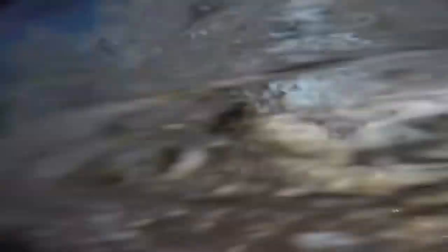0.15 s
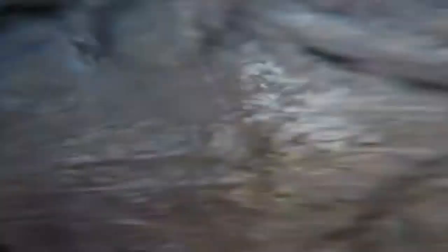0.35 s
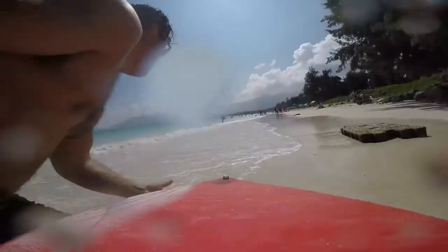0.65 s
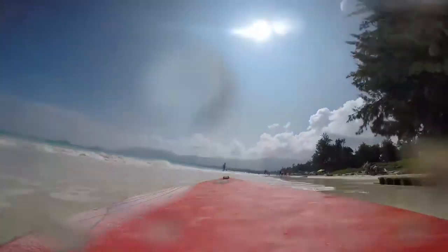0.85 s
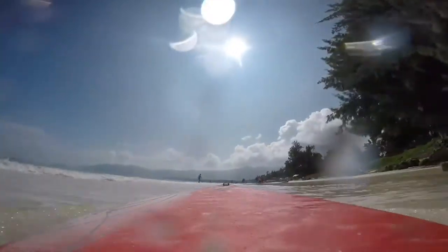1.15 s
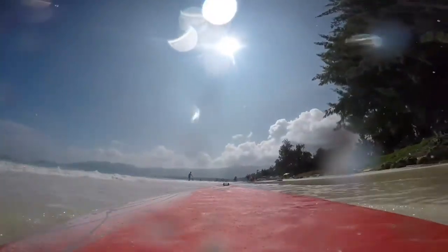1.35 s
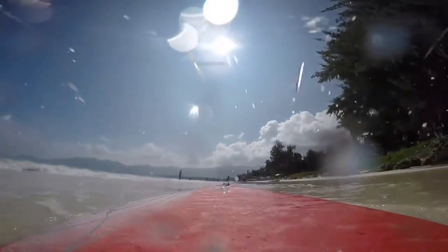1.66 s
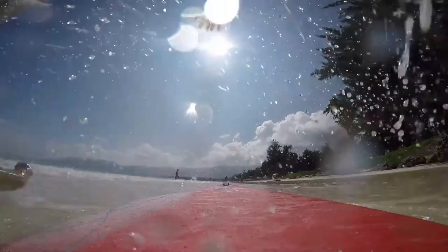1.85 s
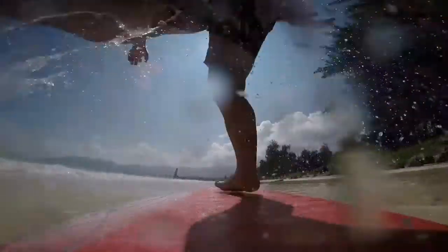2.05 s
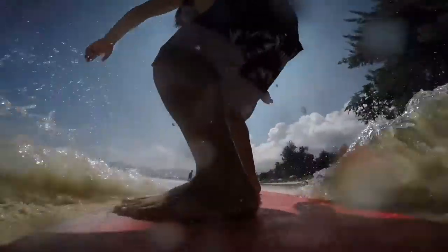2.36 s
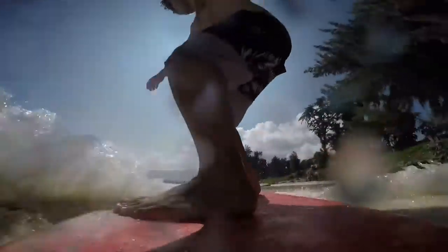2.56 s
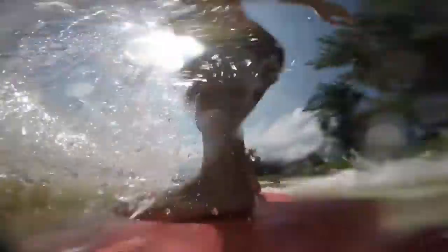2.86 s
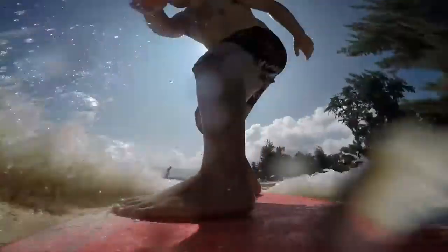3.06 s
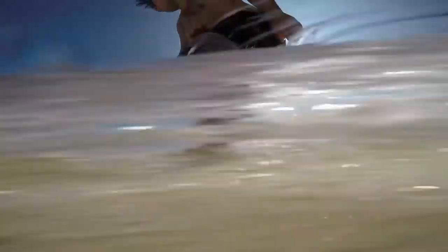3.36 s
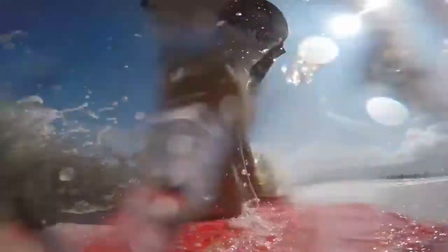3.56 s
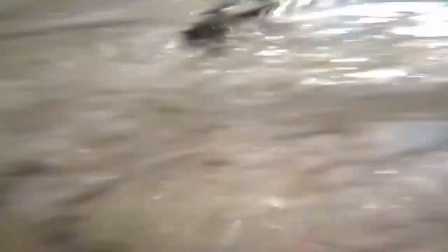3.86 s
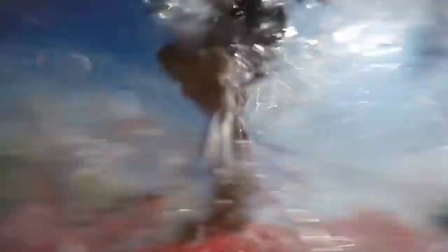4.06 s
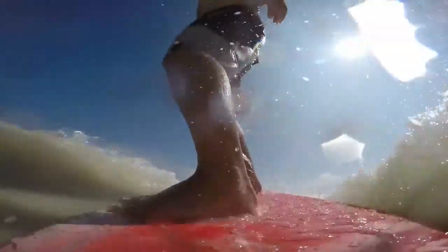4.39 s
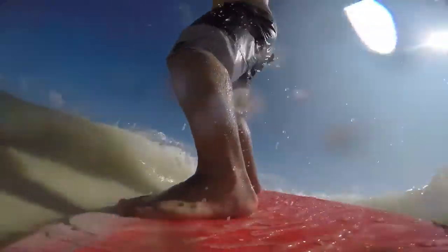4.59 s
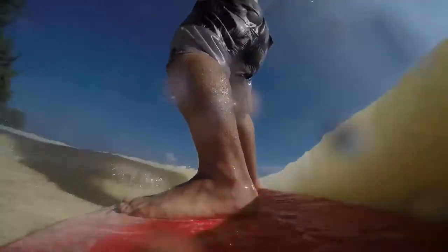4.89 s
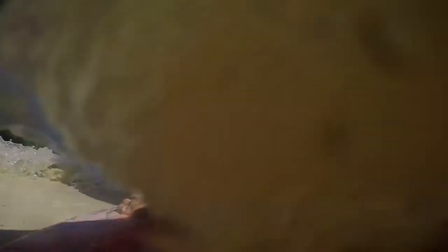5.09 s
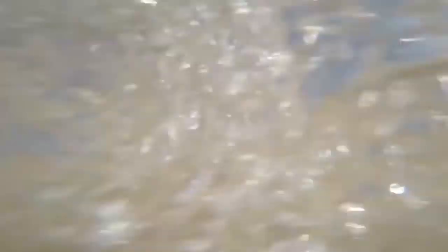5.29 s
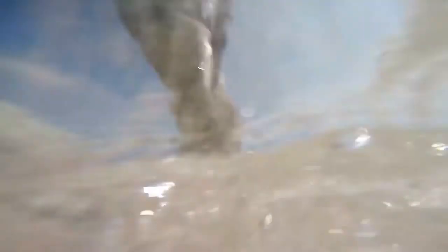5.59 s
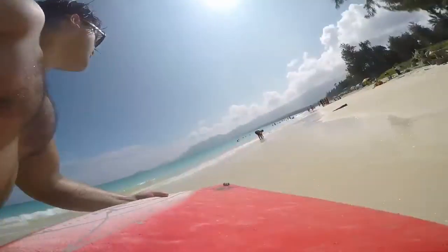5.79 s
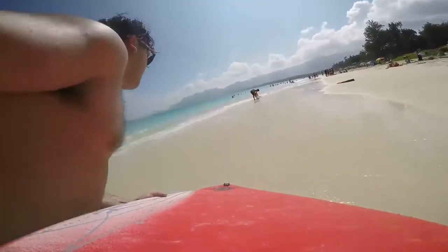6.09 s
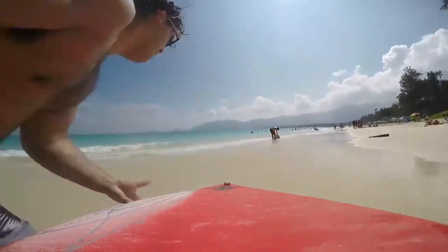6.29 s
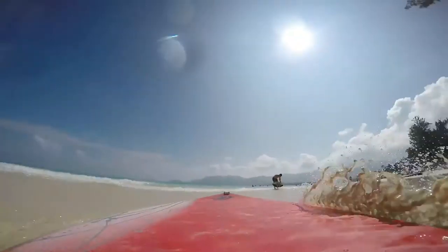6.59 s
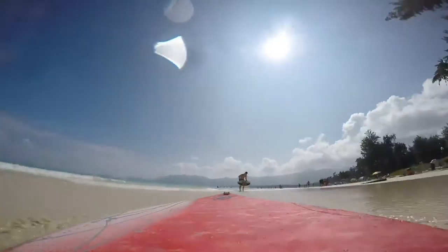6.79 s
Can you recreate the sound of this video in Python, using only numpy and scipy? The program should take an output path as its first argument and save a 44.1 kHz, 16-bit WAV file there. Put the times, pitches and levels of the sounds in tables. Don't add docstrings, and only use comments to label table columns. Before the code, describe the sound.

The sound starts at full force: foam gushes and crackles over a hard hollow case, with sharp ringing drops, until it stops abruptly near 0.5 s. Small slaps and clicks lead to a very loud, overloaded knock with a deep thud at 0.95 s. From 1.0 to 1.7 s it is nearly quiet, just faint fizz. Light plastic taps at 1.7 s and board knocks around 2.15 s follow, with low booming and thin froth. A hard bright splash-smack lands at 2.8 s, another at 3.4 s, and a crackling cluster at 3.75-4.0 s. Gurgling and rumble continue; water sheets build from 4.97 s into slaps at 5.13 s, then a deep thump and a big bubble gulping upward at 5.2-5.35 s. It thins out, with knocks at 5.84 s, wet clicks near 6.1 s, a tap at 6.39 s and a distorted bang at 6.55 s, fading to soft fizz by 7 s.

```python
import sys
import numpy as np
from scipy import signal
from scipy.fft import rfft, irfft, next_fast_len
from scipy.io import wavfile
from scipy.ndimage import uniform_filter1d

SR = 44100
rng = np.random.default_rng(int(sys.argv[2]) if len(sys.argv) > 2 else 0)


def elevation(decibels):
    levels = np.asarray(decibels, float)
    return 10 ** (levels / 20)


def digitize_waveform(pressure):
    field = np.atleast_2d(pressure).T
    bounded = np.clip(field, -1, 1)
    quanta = np.round(bounded * 32767).astype(np.int16)
    wavfile.write(sys.argv[1], SR, quanta)


N = 306054


def evened(x):
    return x / np.sqrt(np.mean(x ** 2) + 1e-20)


def curve(rows, column):
    rows = np.vstack(rows)
    return elevation(np.interp(np.arange(N) / SR, rows[:, 0], rows[:, column]))


def colour(x, points):
    hz, db = np.transpose(points)
    size = next_fast_len(len(x))
    bin_hz = np.fft.rfftfreq(size, 1 / SR)
    gain = elevation(np.interp(np.log(bin_hz + 1), np.log(hz), db))
    return irfft(rfft(x, size) * gain, size)[:len(x)]


def band(x, lo_hz, hi_hz, order=2):
    edges = [lo_hz, min(hi_hz, SR / 2.1)]
    return signal.sosfilt(signal.butter(order, edges, "band", fs=SR, output="sos"), x)


def add(mix, s, sound):
    part = mix[round(s * SR):][:len(sound)]
    part += sound[:len(part)]


def froth(per_s, spread_db, lo_hz, hi_hz, cycles, smooth, count=24):
    out = np.zeros(N)
    for hz in np.geomspace(lo_hz, hi_hz, count):
        u = np.arange(int(3 * cycles * SR / hz)) * hz / SR
        wavelet = hz * np.sin(2 * np.pi * u * (1 + 0.023 * u)) * np.exp(-u / cycles * 2)
        bursts = rng.random(N) < per_s / count / SR
        size = elevation(spread_db * np.minimum(rng.exponential(1, N), 5)) * bursts
        out += signal.oaconvolve(size, wavelet)[:N]
    return evened(out) + smooth * rng.standard_normal(N)


def patchy(x, depth_db, bins=5, frames=14):
    z = signal.stft(x, nperseg=512, noverlap=384)[2]
    patches = uniform_filter1d(rng.standard_normal(z.T.shape).T, bins, 0)
    patches = evened(uniform_filter1d(patches, frames, 1))
    return signal.istft(z * elevation(depth_db * patches), nperseg=512, noverlap=384)[1][:len(x)]


def flicker(hz, depth_db):
    steps = rng.standard_normal(int(N / SR * hz) + 2)
    return elevation(depth_db * np.interp(np.arange(N) / SR * hz, np.arange(len(steps)), steps))


# frequency in Hz, level in dB per Hz.
FOAM = [(290, -54.5), (500, -31.5), (571, -54), (666, -8), (949, 3.5), (1040, 7), (1240, 10), (1410, 4),
        (2510, 6), (2800, 5), (3160, -8), (3490, -2), (7000, -20.5), (9100, -72.5), (15400, -120)]
# frequency in Hz, level in dB per Hz.
SPRAY = [(2060, -8.5), (3500, -14), (4470, -1.5), (5330, -5.5), (5910, -5.5), (7260, -12), (13800, -19.5),
         (15700, -26.5), (16400, -86)]
# frequency in Hz, level in dB per Hz.
SHEET = [(350, -37), (600, -13.5), (687, -6), (1060, 2), (1770, -1.5), (2100, 4), (2430, 1.5),
         (4450, -10.5), (5450, -24), (6000, -25.5), (7800, -43), (13200, -120)]
# time in seconds, foam, spray and slosh levels in dB.
WATER = [(0.0, -25, -29.5, -27), (0.07, -14.5, -23, -43), (0.15, -25, -31.5, -43.5),
         (0.274, -23.5, -38.5, -42), (0.424, -17.5, -29.5, -34), (0.494, -12, -30, -33.5),
         (0.509, -44.5, -61, -46), (0.539, -41, -55.5, -48), (0.718, -42, -48, -58), (0.883, -39, -49, -54),
         (0.913, -46.5, -55, -55), (1.187, -44.5, -63, -57.5), (1.282, -55, -72, -60),
         (1.497, -47, -69.0, -55), (1.546, -45.5, -63, -49.5), (1.786, -50, -65, -63),
         (1.816, -43, -53, -41), (1.866, -50.5, -59, -54), (1.931, -41, -55, -52.0), (2.05, -47, -61, -49),
         (2.115, -43.5, -55, -45), (2.35, -38.5, -47, -37), (2.38, -37.5, -48, -44),
         (2.519, -42.5, -55, -48.5), (2.624, -34.5, -52, -43.5), (2.754, -38, -52, -52.0),
         (3.003, -41.5, -55, -39), (3.283, -40, -51.5, -52), (3.637, -37, -56, -44),
         (3.732, -35.5, -43, -48), (4.026, -43, -41, -57), (4.096, -38, -52, -39),
         (4.275, -43.5, -52.5, -49.5), (4.375, -42, -59, -48), (4.475, -41, -60, -38),
         (4.57, -46, -57, -45.5), (4.649, -44.5, -62, -53), (4.869, -39.5, -50, -51.5),
         (5.353, -42, -60, -49.5), (5.443, -42.5, -55.5, -39.5), (5.532, -39.5, -54.5, -53),
         (5.732, -35.5, -51, -54), (5.747, -46.5, -59.5, -52), (5.941, -46.0, -54.5, -53),
         (5.996, -43.5, -53.5, -44), (6.435, -41.5, -53, -62), (6.495, -54.5, -63.0, -56.5),
         (6.67, -46, -64, -50.5), (6.72, -55.5, -65, -63.5), (6.939, -48.5, -66.5, -58)]


def water():
    surge = flicker(40, depth_db=1.4)
    foam_level, spray_level, slosh_level = (curve(WATER, column) for column in (1, 2, 3))

    bubbles = patchy(froth(4000, 3.9, 600, 6220, cycles=4.6, smooth=1.2), depth_db=1.55)
    wet = np.clip(foam_level / elevation(-26.5), 0, 1) ** 2
    distant = np.sqrt(1 - wet) * evened(colour(bubbles, FOAM))
    touching = np.sqrt(wet) * evened(colour(bubbles, SHEET))
    foam = elevation(-0.13) * foam_level * evened(distant + touching)

    fine = patchy(froth(3000, 3.0, 4000, 17000, cycles=2.4, smooth=0.57), depth_db=3.0)
    spray = elevation(-2.0) * spray_level * evened(colour(fine, SPRAY))

    dull = band(froth(600, 3.0, 250, 1000, cycles=2.9, smooth=1.1), 210, 1000, order=3)
    slosh = elevation(-0.1) * slosh_level * evened(dull)
    return surge * (foam + spray + slosh)


# time in seconds, board boom in dB, handling sway in dB.
BOARD = [(0.0, -20, -24), (0.075, -15, -19.5), (0.11, -31.5, -30), (0.229, -33.5, -36),
         (0.444, -29.5, -33.5), (0.489, -17.5, -25), (0.654, -32.5, -17), (0.728, -18.5, -16.5),
         (0.938, -21.5, -13), (0.948, -1.5, -5), (1.078, -44.5, -50), (1.227, -52, -53),
         (1.322, -39.5, -48), (1.377, -45, -52), (1.556, -36.5, -50), (1.671, -56, -48),
         (1.771, -24.5, -36.0), (1.846, -17.5, -41), (1.931, -41.5, -43.0), (1.98, -18.5, -48),
         (2.05, -42.5, -56), (2.16, -14.5, -10), (2.245, -31, -30), (2.295, -15.5, -32), (2.39, -45, -38),
         (2.529, -27, -43), (2.569, -41, -31.5), (2.659, -22.5, -27), (2.709, -34, -34), (2.789, -24, -31),
         (2.829, -6.5, -17), (2.938, -43.5, -43), (3.163, -43, -38), (3.218, -25.5, -51), (3.273, -37, -42),
         (3.397, -36, -28), (3.412, -8, -11.5), (3.557, -30.5, -35.5), (3.751, -33.5, -28),
         (3.766, -6, -13.5), (3.886, -17, -24.5), (4.011, -28.5, -34), (4.121, -17, -30),
         (4.28, -29.5, -34), (4.49, -16.5, -27.5), (4.53, -25, -34), (4.59, -27.0, -35.5),
         (4.629, -45, -29.5), (4.749, -28.5, -33.5), (4.914, -37, -42.0), (5.004, -24, -20.5),
         (5.118, -26.5, -27), (5.218, -9.5, -25), (5.333, -50, -47), (5.478, -49, -51), (5.542, -40.5, -49),
         (5.627, -64, -49.5), (5.767, -37, -33.5), (5.832, -27, -23), (5.847, -18.5, -16),
         (5.986, -35.5, -31.5), (6.051, -19.5, -20), (6.261, -42.5, -16), (6.38, -13.5, -11.5),
         (6.535, -29, -31.5), (6.55, -11.5, -4), (6.615, -17.5, -26), (6.73, -60, -62), (6.82, -51.5, -57),
         (6.939, -63.5, -60)]


def board():
    def steady(x):
        return x / np.sqrt(uniform_filter1d(x ** 2, size=2600) + .07 * np.mean(x ** 2))

    push, load = curve(BOARD, 1), curve(BOARD, 2)
    boom = band(band(rng.standard_normal(N), 83.2, 99.2, order=1), 56, 130.4, order=4)
    sway = band(band(rng.standard_normal(N), 20, 52), 17, 60)
    upper = evened(band(rng.standard_normal(N), 149, 214.7))
    upper = elevation(-3.0) * upper * np.sqrt(push * load) ** 1.724
    return elevation(1.27) * push * steady(boom) + elevation(1.65) * load * steady(sway) + upper


# start in seconds, peak in dB, ring in Hz,
# then spray and body levels in dB relative to the ring.
SLAPS = [(0.029, -8.5, 2730, -11.5, -27), (0.084, -1, 2210, -26.5, -31), (0.185, -10.5, 2020, -12, -43),
         (0.242, -19.5, 1940, -39, -25), (0.293, -17, 3160, 1.5, -37), (0.44, -3, 2290, -36, -34),
         (0.57, -20.5, 2100, -24, -30), (0.578, -22, 2300, -3, -36), (0.601, -17.5, 2200, -14, -36),
         (0.624, -8, 2070, -14, -24.5), (0.638, -8.5, 1890, -32.5, -36), (0.663, -16.5, 2010, -12, -40),
         (0.711, -20.5, 1090, -11, -10), (0.766, -19.5, 2030, 0, -11), (0.799, -6.5, 1080, -20.5, -12),
         (0.941, 10, 1337, -15, -12), (1.272, -34, 1510, -23, -8.5), (1.697, -8, 1410, -24, -19.5),
         (1.721, -13, 1550, -25.5, -20), (1.756, -22, 2160, -38, -8.5), (1.807, -40, 840, -25, -7),
         (1.825, -26, 1310, -20, -5.5), (1.908, -31, 1060, -24, -20), (1.927, -22, 1950, -30, -18),
         (2.08, -34.5, 820, -35.5, 0), (2.096, -24, 2560, -18.5, -21), (2.143, -22.5, 1260, -40, -6),
         (2.21, -22, 2800, -24, -19), (2.233, -11, 1600, -31, -14), (2.774, -8.5, 2170, 2, -41),
         (2.801, 1.5, 2230, -5.5, -35), (3.402, 1.5, 2070, -8.5, -22), (3.438, -6.5, 2170, -14, -24),
         (3.497, -16.5, 4180, -3.5, -11), (3.517, -19.5, 2030, -2, -25), (3.704, -41.5, 2200, -18, -22),
         (3.755, -3.5, 4000, -5.5, -17), (3.77, -18, 940, -18.5, -21), (3.79, -1, 2740, -12, -32),
         (3.854, -8, 2100, -17.5, -9), (3.951, -12, 2230, -16, -34), (3.971, -13, 4160, -6.5, -38),
         (4.076, -14.5, 2410, -27, -26), (4.167, -26, 1170, -32, -4.5), (4.456, -38.5, 1280, -11.5, 9),
         (4.684, -24.5, 1880, -31, -36), (4.936, -21.5, 1510, -36, -31), (4.974, -28, 1900, -23, -14),
         (5.043, -19.5, 2200, -22, -25), (5.134, -2, 2390, -19, -20), (5.155, -1, 2340, -17, -26),
         (5.363, -32, 2080, -33, -25), (5.387, -16.5, 2630, -41, -32), (5.653, -21.5, 2420, -24, -23),
         (5.833, -19, 1030, -34, 0), (6.04, -30.5, 1080, -38, 8.5), (6.099, -11.5, 988, -12, -24.5),
         (6.354, -24.5, 810, -31, 7.5), (6.363, -18, 1140, -29, 5.5), (6.387, -5, 1060, -23, -8),
         (6.542, 9.5, 840, -13.5, -6), (6.567, -2, 905, -39, -3.5)]


def slaps():
    out, t = np.zeros(N), np.arange(SR // 16) / SR
    for s, db, hz, spray_db, body_db in SLAPS:
        a, b, c, d = rng.standard_normal((4, len(t)))
        tail = elevation(-11.0 - 60 * t / 0.023) * evened(band(a, 1200, 3330))
        wobble = hz * (1 + 0.053 * evened(uniform_filter1d(d, size=60)))
        ring = elevation(-60 * t / 0.018) * np.sin(2 * np.pi * np.cumsum(wobble) / SR)
        ring *= 1 - np.exp(-t / 0.00045)
        crack = elevation(spray_db - 2.0 - 60 * t / 0.014) * evened(colour(b, SPRAY))
        body = elevation(body_db + 1.5 - 60 * t / 0.042) * evened(band(c, 140, 884))
        add(out, s, elevation(db + 1.5) * (ring + tail + crack + body))
    return out


# start in seconds, length in seconds, level in dB,
# spray and body in dB relative to that level, change over the length in dB.
SHEETS = [(0.626, 0.044, -31.5, 0.5, -23, -4.5), (0.76, 0.072, -27, -16, -9.5, 7),
          (0.943, .07, -30.5, -22, -10, -3.5), (1.709, 0.065, -36, -12, -9, -1),
          (2.133, 0.053, -33.5, -17, -17, 6), (2.222, .11, -26.5, -24, -23, -0.5),
          (2.769, 0.033, -22.5, 4, -11, -15.5), (2.808, 0.054, -10.5, -2, -13.5, -19),
          (3.4, 0.071, -8, -8, -8.5, -14.5), (3.48, 0.043, -38.5, 8.5, 7, -2.5),
          (3.76, 0.15, -15, -6, -7, -6.5), (3.941, .045, -38.5, 13.5, 2, -12),
          (4.973, 0.2, -24, -9.5, -17.5, 6.5), (5.183, 0.08, -14.5, -10.5, 9, -26.5),
          (6.054, 0.037, -52, -27, 13, -12), (6.089, 0.066, -33, -28, -4.5, -3),
          (6.301, 0.12, -33.5, -22, -7, 0), (6.353, 0.048, -23, -20, -8, -0.5),
          (6.538, 0.082, -13.5, -14.5, 3.5, -24)]


def sheets():
    surge = flicker(160, depth_db=1.8)
    crackle = froth(5000, 4.25, 727, 5660, cycles=5.9, smooth=0.95)
    crackle = patchy(crackle, depth_db=2.0, frames=6)
    fine = froth(4000, 6.4, 4000, 15000, cycles=3.5, smooth=1.17)
    dull = froth(400, 2.5, 150, 800, cycles=2.2, smooth=.5)
    colours = [colour(crackle, SHEET), colour(fine, SPRAY), band(dull, 140, 750)]
    froths = [evened(x * surge) for x in colours]

    out = np.zeros(N)
    for s, length, db, spray_db, body_db, fade_db in SHEETS:
        t = np.arange(int((length + .06) * SR)) / SR
        tear_db = 60 * np.maximum(t - length, 0) / 0.03
        shape = elevation(db + fade_db * t / length - tear_db) * (1 - np.exp(-t / 0.0025))
        mid, high, low = (x[round(s * SR):][:len(t)] for x in froths)
        add(out, s, shape * (mid + elevation(spray_db) * high + elevation(body_db) * low))
    return out


# start in seconds, peak in dB, starting pitch in Hz,
# time to fall 60 dB in seconds.
THUMPS = [
    (0.949, 2.5, 55.8, 0.14),
    (2.148, -4, 80.4, 0.16),
    (2.181, 1.5, 60, 0.06),
    (2.816, 10, 72.8, 0.067),
    (3.41, -10.5, 79, 0.26),
    (5.196, 6, 50.6, 0.11),
    (5.836, 1, 63, .12),
    (6.546, 9, 50.7, 0.14),
]


def thumps():
    out, t = np.zeros(N), np.arange(SR // 3) / SR
    bend = 1 + 0.38 * (1 - np.exp(-t / 0.024))
    for s, db, hz, t60 in THUMPS:
        add(out, s, elevation(db - 60 * t / t60) * np.sin(2 * np.pi * np.cumsum(hz * bend) / SR))
    return out


# time in seconds, pitch in Hz, level in dB.
BUBBLE = [
    (5.199, 88, -38),
    (5.215, 126, -1),
    (5.227, 155, -8),
    (5.252, 163, -16.5),
    (5.289, 217, -25),
    (5.318, 297, -26.5),
    (5.345, 333, -43),
]


def bubble():
    s, hz, db = np.transpose(BUBBLE)
    t, out = np.arange(s[0], s[-1], 1 / SR), np.zeros(N)
    level = np.sqrt(2) * elevation(np.interp(t, s, db))
    add(out, s[0], level * np.sin(2 * np.pi * np.cumsum(np.interp(t, s, hz)) / SR))
    return out


# start in seconds, peak in
# dB, pitch in Hz, time to fall 60 dB in seconds, # rise of pitch per second.
BLIPS = [(.82, -22, 180, 0.21, 0.092), (2.14, -16, 1288, 0.12, .1), (2.813, 3, 3400, 0.025, .1),
         (2.83, 1, 3640, 0.024, .1), (5.134, 1, 665, 0.02, 0.11), (5.183, -1.5, 488, 0.07, .1),
         (5.184, -3, 670, 0.1, .1), (5.308, -20.5, 557, 0.057, .1), (5.388, -33, 2600, 0.01, .1),
         (5.4, -40, 418, .2, 6.4), (5.447, -16, 653, 0.025, 3.8), (5.834, -6, 2010, 0.013, .1),
         (6.042, -15, 776, 0.034, 0.084), (6.13, -29, 284, 0.28, .1)]


def blips():
    out, t = np.zeros(N), np.arange(SR // 3) / SR
    onset = 1 - np.exp(-t / 0.0022)
    for s, db, hz, t60, rise in BLIPS:
        add(out, s, elevation(db - 60 * t / t60) * onset * np.sin(2 * np.pi * hz * t * (1 + rise * t)))
    return out


# start in seconds, length in seconds, middle pitch in Hz, level in dB.
GURGLES = [(0.789, 0.051, 2300, -28), (2.58, 0.11, 2470, -37), (3.572, 0.12, 1550, -35),
           (4.07, 0.077, 1110, -32.5), (4.17, 0.049, 1010, -36.5), (4.399, .15, 1100, -33.5),
           (4.98, 0.2, 4600, -31), (5.39, .08, 594, -43), (5.499, 0.2, 3300, -52),
           (6.094, 0.041, 970, -22.5), (6.637, 0.029, 2100, -37)]


def gurgles():
    out = np.zeros(N)
    for s, length, hz, db in GURGLES:
        noise = band(rng.standard_normal(SR // 2), hz - 7 * np.sqrt(hz), hz + 9 * np.sqrt(hz))
        noise = noise[:int(length * SR)]
        add(out, s, elevation(db) * evened(noise) * signal.windows.tukey(len(noise), .7))
    return out


# start in seconds, peak in dB, pitch in Hz.
TICKS = [(0.5257, -30, 5290), (2.8847, -38.5, 5110), (2.9466, -44, 5070), (3.55, -19.5, 5770),
         (3.592, -29, 7750), (3.703, -34.5, 5550), (4.0463, -28.5, 5080), (4.129, -29.5, 10400),
         (4.496, -41.5, 5200), (5.3123, -35.5, 5500), (5.5735, -41.5, 5640), (5.732, -33, 9250),
         (6.114, -17.5, 5000), (6.1292, -19, 5390), (6.145, -16.5, 5200)]


def ticks():
    out, t = np.zeros(N), np.arange(SR // 40) / SR
    for s, db, hz in TICKS:
        click = evened(band(rng.standard_normal(len(t)), 0.29 * hz, 1.1 * hz, order=1))
        add(out, s, elevation(db - 0.5 - 60 * t / 0.016) * click)
    return out


def hiss():
    return elevation(-84) * band(rng.standard_normal(N), 100, 11000)


def scene():
    wet = water() + sheets() + slaps() + gurgles() + ticks()
    tones = board() + thumps() + bubble() + blips()
    return (wet + tones + hiss())[None]


def top_cut(x):
    return signal.sosfilt(signal.butter(12, 16530, fs=SR, output="sos"), x)


def record(dry):
    knee, top = 3, .97
    clipped = dry / (1 + abs(dry / top) ** knee) ** (1 / knee)
    edge = signal.firwin(127, 15800, fs=SR)[None]
    return top_cut(signal.oaconvolve(clipped, edge, "same"))


dry = scene()
out = record(dry)
digitize_waveform(out)
```